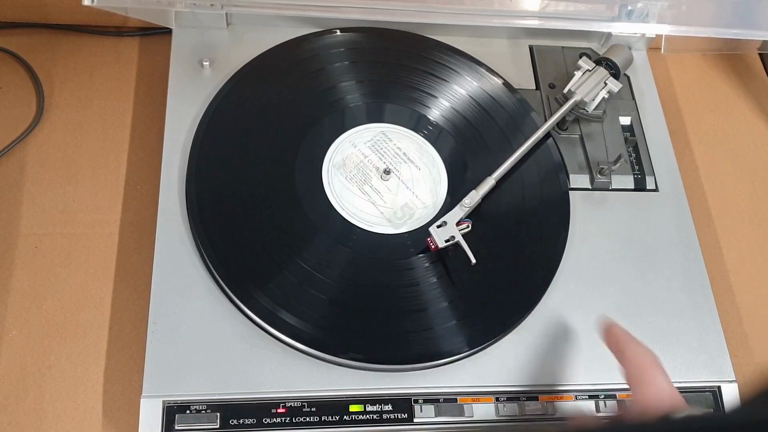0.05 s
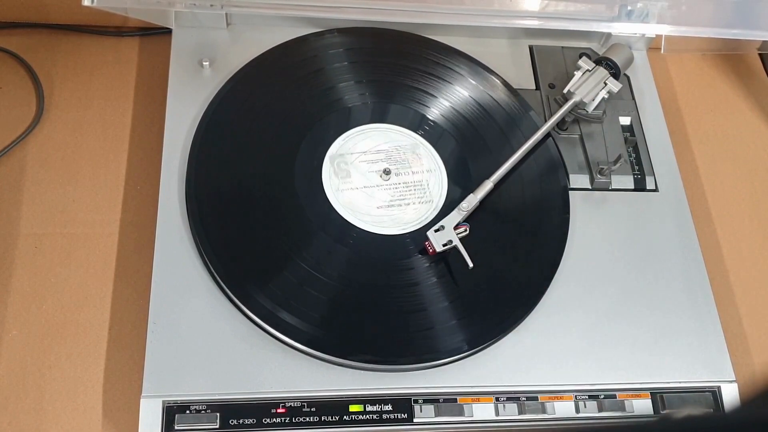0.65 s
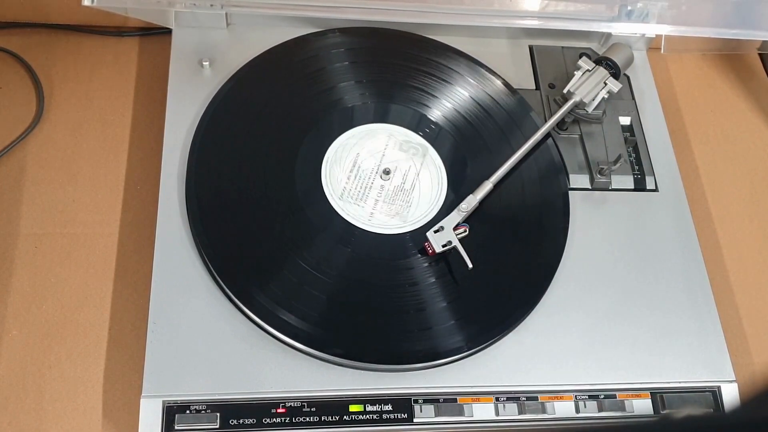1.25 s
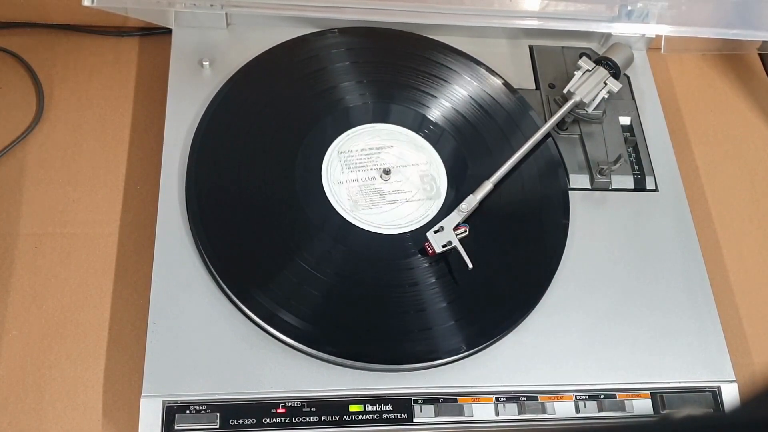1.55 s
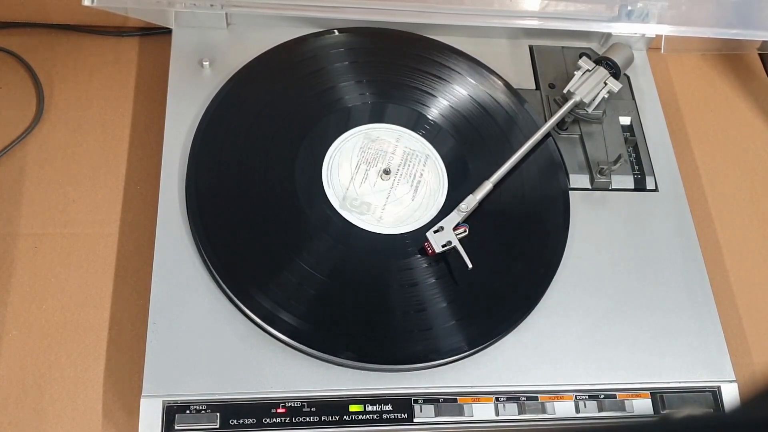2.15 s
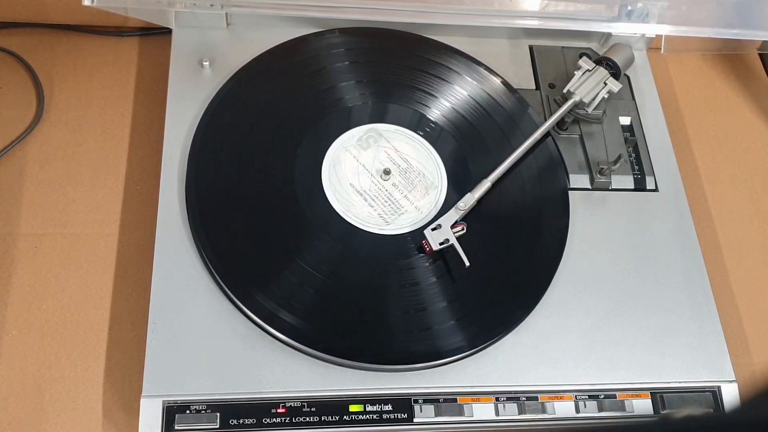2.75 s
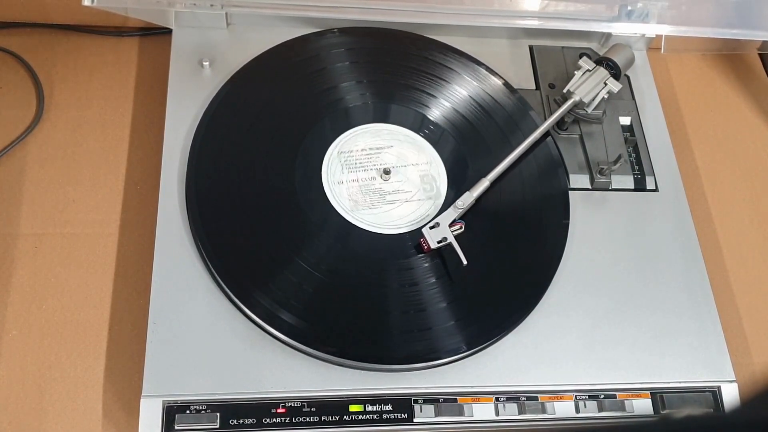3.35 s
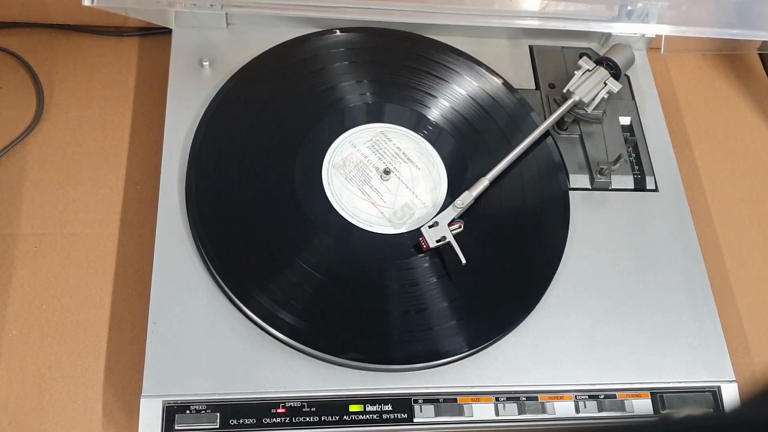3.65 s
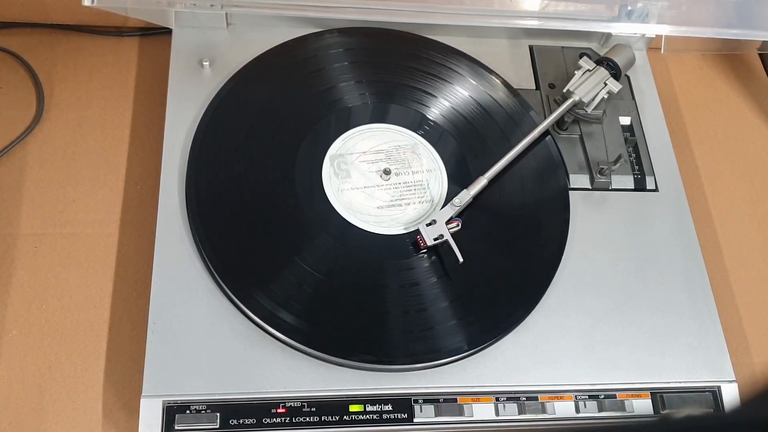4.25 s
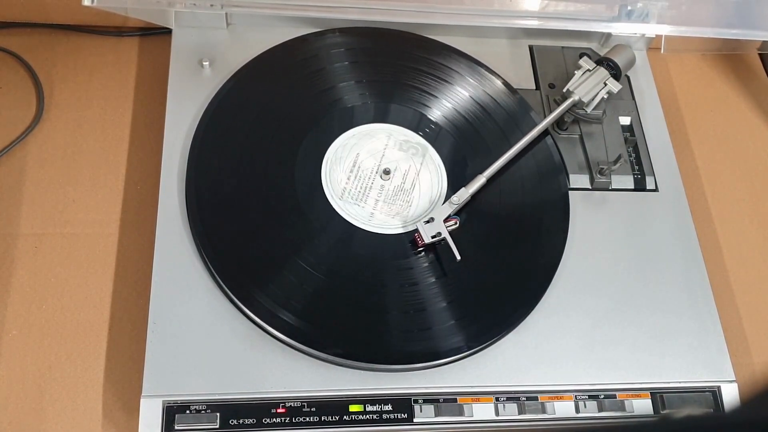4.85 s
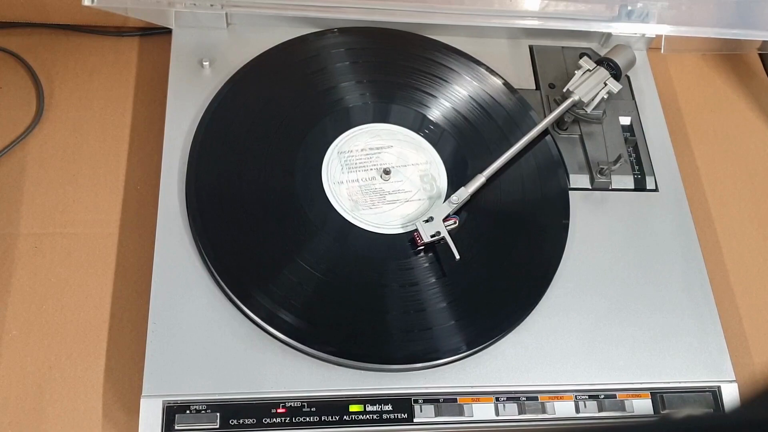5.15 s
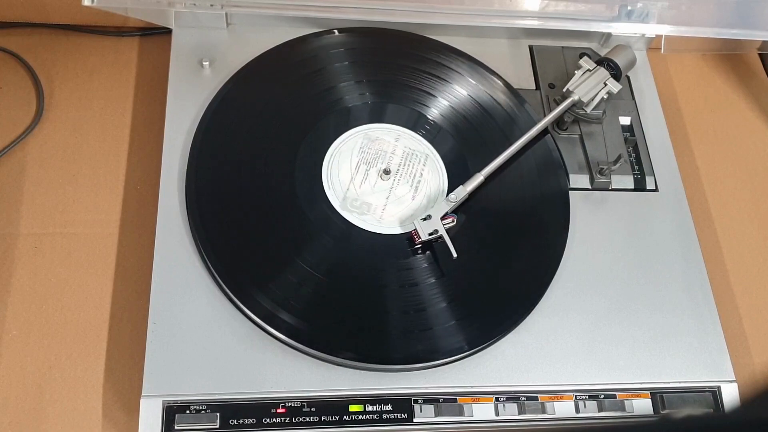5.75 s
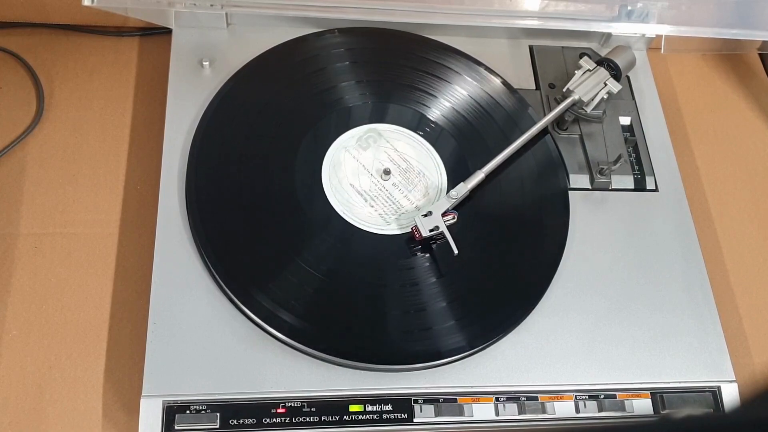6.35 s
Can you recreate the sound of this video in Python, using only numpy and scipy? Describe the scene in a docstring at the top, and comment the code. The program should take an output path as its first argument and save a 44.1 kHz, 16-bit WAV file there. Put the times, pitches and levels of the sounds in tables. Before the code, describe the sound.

A button clicks, a record player's stylus thumps down, and the groove rumbles and crackles until the arm lifts with a groan and thump.

```python
"""Record player in a small room

A button snaps and the stylus drops on the record with two thumps from a loudspeaker on the left.
The silent groove rumbles and swishes as the record turns, and specks pop under the stylus.
Then the return gear sticks and slips with a groan, and the arm lifts off with a last thump."""
import sys
import numpy as np
from scipy import signal
from scipy.fft import rfft, irfft
from scipy.io import wavfile
from scipy.ndimage import uniform_filter1d

SR = 44100
rng = np.random.default_rng(int(sys.argv[2]) if len(sys.argv) > 2 else 0)


def log_audio(samples):
    """Write samples as a 16-bit WAV file to the path given in sys.argv[1]."""
    # one column per channel
    frames = np.atleast_2d(samples).T
    # limit to full scale, then quantise
    limited = np.clip(frames, -1, 1)
    pcm = np.round(limited * 32767).astype(np.int16)
    wavfile.write(sys.argv[1], SR, pcm)


N = 290619
TIME = np.arange(N) / SR
RING_TIME = np.arange(SR // 2) / SR
TURN_S = 1.8

# Jolts that reach the pickup. Each row: start in seconds, woofer level in dB, pitch in Hz,
# swell in seconds, crack level in dB, crack low-pass in Hz.
JOLTS = [(.448, -43.5, 63, .013, -58, 502), (0.8085, -6.5, 213, 0.006, -15.5, 4930),
         (0.8217, -16, 120, 0.0057, -30, 598), (.8840, -4, 172.3, 0.0039, -0.5, 5430),
         (2.768, -41, 222, 0.00444, -51, 800), (3.0200, -43, 187, 0.0051, -52.5, 900),
         (5.9178, -30, 195, 0.0056, -57, 510), (6.0691, -28.5, 174.6, .004, -41, 600),
         (6.0777, -29, 347, 0.0048, -15.5, 455), (6.0786, -7.5, 146.3, 0.0043, -66, 508)]
# Big specks in the groove. Each row: start in seconds, then body, snap and spray in relative dB.
POPS = [(1.091, -48, -70, -63.5), (1.804, -45.5, -67, -68), (2.147, -48, -78, -84.5),
        (2.262, -49.5, -61.5, -73), (2.637, -50, -73, -70.5), (2.766, -45, -66, -83),
        (3.022, -40, -63, -67), (3.193, -40.5, -54.5, -66), (3.224, -47, -64, -61.5),
        (3.536, -45, -65, -64), (3.686, -38.5, -52, -52), (3.996, -55, -55, -67), (4.051, -42.5, -66, -86),
        (4.304, -45.5, -81, -73), (4.408, -40.5, -82, -85), (4.465, -46.5, -81, -67),
        (5.144, -49, -75, -84), (5.379, -51, -67, -69), (5.649, -42, -63, -64), (5.92, -35, -46.5, -52.5)]
# Scuffed patches. Each row: start in seconds, length in seconds, level in dB.
SCUFFS = [(1.70, 0.22, -78.5), (2.817, 0.072, -77), (3.204, .06, -78), (3.663, 0.06, -70),
          (3.735, .08, -76.5), (3.979, 0.038, -74), (4.242, 0.044, -79), (4.642, 0.055, -76.5),
          (5.387, .08, -76.5), (5.604, 0.045, -75), (5.933, 0.093, -76), (6.057, 0.025, -73)]
# Button and switch clicks. Each row: start in seconds, thud in dB, rattle in dB, its T60 in seconds.
CLICKS = [(0.412, -58.5, -46.5, 0.076), (0.4425, -33.5, -40, 0.0026), (.4470, -30, -70, .012),
          (0.4503, -51.5, -75, 0.025), (0.4554, -37.5, -28, 0.031), (0.4579, -36, -23, 0.02),
          (0.4636, -25, -34.5, 0.07), (0.8125, -72.5, -47.5, 0.015), (.8838, -71.5, -39, .007),
          (.9392, -80, -48, 0.025)]
# Groans of the return gear. Each row: start, rise and fall in seconds, pitch in Hz, sag rate per second,
# peak level in dB, drop at both ends in dB, overtone boost in dB.
GROANS = [(5.698, .035, .045, 310, 0.54, -41, 3.5, -11), (5.788, 0.036, 0.09, 125.5, 1.7, -32.5, 19, 4)]

# Resonances. Each row: frequency in Hz, relative level in dB, T60 in seconds.
BOOM_MODES = [(63.5, -34.5, 0.36), (111, -25, 0.33), (188, -33, .22), (226.9, -14, 0.18),
              (365.5, -31.5, 0.1)]  # cabinet and room
ARM_MODES = [(1975, -36.5, .07), (2930, -43.5, 0.07), (3926, -48, .12), (4430, -45.5, .1),
             (5750, -52.5, .15), (7600, -59, 0.17)]  # tone arm
CONE_MODES = [(560, -24.5, 0.0055), (711, -14.5, .016), (946, -9.5, 0.012), (1464, -17.5, 0.021),
              (2135, -30.5, 0.0069)]  # loudspeaker cone
PANEL_MODES = [(225, -11.5, .12), (356.3, -8, 0.08), (415, -15.5, 0.15), (397, 1, 0.14), (614, -5.5, .05),
               (770, -5, 0.053), (856, -10, 0.055), (1380, -18, .03), (2900, -17.5, 0.037),
               (5400, -26.5, 0.07), (5540, -28, 0.08), (10355, -30, 0.068)]  # plastic front panel

# Tone colours of the hits and noise beds. Each row: frequency in Hz, relative level in dB.
CRACK_EQ = [(100, -16.5), (300, -5.5), (600, 4), (1000, -7), (1400, -14), (2100, -18), (3000, -26),
            (4000, -32), (5200, -34.5), (6200, -45), (7500, -50), (11000, -31.5), (16000, -45.5)]
POP_SNAP_EQ = [(500, -40), (1100, 1), (1600, 4), (2700, 4.5), (3300, 0.5), (4200, -33.5), (8000, -51)]
POP_EDGE_EQ = [(1000, -32.5), (2700, -4.5), (4300, 1.5), (5000, -1.5), (6000, 2), (7000, -6.5), (8300, -22),
               (12000, -13.5), (16000, -19)]
DRONE_EQ = [(80, -26), (130, -2), (190, 1.5), (225, -6), (280, -22), (420, -36), (900, -58)]
RUSH_EQ = [(200, -11.5), (330, 0), (450, -4), (750, 1.5), (1000, -1.5), (1250, -5), (1600, -10),
           (2800, -14), (4000, -38), (8000, -47)]
SWISH_EQ = [(1500, -16), (3000, 0), (4400, 5.5), (4900, -1), (5800, 6), (7000, -2.5), (8500, -7),
            (12000, -4), (16000, -16.5)]
LATCH_EQ = [(300, -5), (1000, -0.5), (3000, -6), (4200, -18), (5500, -2.5), (7500, -13.5), (9300, -2),
            (10500, 2.5), (13500, -1.5), (16000, -1.5)]
PLINTH_EQ = [(120, -18.5), (220, 2), (390, -7.5), (520, -10.5), (800, -12.5), (1000, -15.5), (1400, -29.5),
             (3000, -44.5)]
GEAR_EQ = [(50, -19), (100, 11.5), (220, 13), (305, 3), (350, -3), (460, -1.5), (580, -12.5), (740, -8),
           (1000, -27.5), (1500, -38), (4000, -67.5)]
RUMBLE_EQ = [(22, -19.5), (40, -8.5), (60, -2), (90, 1), (130, -4), (200, -19.5), (300, -22.5),
             (600, -44.5), (2000, -69.5)]
HISS_EQ = [(700, -15.5), (1200, -10), (1530, 3), (1800, 0), (2100, -2.5), (2400, 3), (2800, 3.5),
           (3100, -3.5), (3600, -20.5), (5000, -43.5)]
AIR_EQ = [(5000, -19.5), (9000, -15.5), (10500, -3), (11800, 1.5), (14500, -4), (16000, -3.5)]
ROOM_TONE_EQ = [(25, -9), (60, 3), (130, -6), (250, -20.5), (450, -28), (1100, -30.5), (1700, -38.5),
                (4500, -41.5), (8000, -52.5)]

# A slight warp swells the groove noise. Each row: swells per turn, first crest in seconds, depth in dB.
DRONE_SWELLS = [(1, 1.53, 1.8), (4, 0.15, 1.7)]
RUSH_SWELLS = [(1, 1.65, 0.8), (2, .31, 1.1), (4, .41, 1.5)]
SWISH_SWELLS = [(2, 0.17, 2), (5, .35, 1.5)]

# Fader rides for the stylus rush and platter rumble. Each row: time in seconds, relative level in dB.
RUSH_FADER = [(1.2, -73), (1.43, -75.5), (2.58, -79.5), (2.78, -77), (3.29, -77), (3.69, -71.5),
              (4.17, -77.5), (4.66, -72), (5.19, -76.5), (5.6, -72)]
RUMBLE_FADER = [(0.15, -80), (0.7, -51), (1.2, -55), (2.0, -67), (2.55, -57.5), (2.95, -60), (3.45, -53.5),
                (4.5, -52.5), (5.15, -57), (6.45, -59)]
# Fader rides for the hiss. Each row: time in seconds, then narrow and airy hiss in relative dB.
HISS_FADER = [(0.0, -73.5, -86.5), (0.83, -66, -76.5), (1.19, -71.5, -81.5), (2.7, -72, -84.5),
              (3.87, -66.5, -79), (5.03, -68.5, -79), (5.87, -66.5, -76.5), (6.2, -69.5, -81),
              (6.59, -70, -82)]

# How alike left and right are. Each row: frequency in Hz, coherence from 0 to 1.
COHERENCE = [(60, 0.95), (200, 0.97), (400, 1), (800, 0.68), (3000, 0.14), (7000, 0.34), (13000, .55)]
# Shading of the loudspeaker on the far side. Each row: frequency in Hz, right minus left in dB.
SHADOW_EQ = [(60, -3.5), (200, -0.5), (400, -10.5), (750, -4), (1300, -9.5), (2400, -7), (4400, -10.5),
             (9000, -19)]
# Early echoes off desk, lid and wall. Each row: delay in seconds, level in dB.
ECHOES = [(.0009, -17.5), (.0022, -9), (.0029, -11.5), (.0043, -14.5), (.0074, -14)]
# Reverb decay. Each row: frequency in Hz, T60 in seconds.
REVERB_T60 = [(100, 0.096), (220, 0.51), (600, 0.15), (1500, 0.22), (5000, 0.27), (14000, 0.23)]
# Reverb colour. Each row: frequency in Hz, gain in dB.
REVERB_EQ = [(60, -24), (200, -13), (400, -11), (700, -11), (1200, -9.5), (3000, -5.5), (6000, -9),
             (14000, -12)]


def stylus_thumps():
    """Each jolt gives a crack, a few swelling woofer cycles and a boom; the tone arm rings faintly."""
    woofer, cracks = np.zeros((2, N))
    for start, woofer_db, hz, swell_s, crack_db, lowpass_hz in JOLTS:
        progress = RING_TIME / swell_s
        swell = (progress * np.exp(1 - progress)) ** 2
        add(woofer, start, -amp(woofer_db) * swell * np.sin(2 * np.pi * hz * RING_TIME))
        add(woofer, start + swell_s, amp(woofer_db) * ring(BOOM_MODES))
        crack = signal.lfilter(*signal.butter(2, lowpass_hz, fs=SR), pulse(CRACK_EQ))
        add(cracks, start, amp(crack_db) * crack)
    arm = signal.oaconvolve(np.diff(cracks, prepend=0), ring(ARM_MODES))[:N]
    return loudspeaker(woofer + cracks, reverb_db=-3) + arm


def crackle(body_gain_db=9, snap_gain_db=13, spray_gain_db=12, low_cut_hz=520, detune=.07):
    """Specks flick the stylus, shake the cone and crumble in a spray, with grit and dust between them."""
    pops = np.zeros(N)
    snap, edge = pulse(POP_SNAP_EQ), pulse(POP_EDGE_EQ)
    for start, body_db, snap_db, spray_db in POPS:
        crumbs = rng.standard_normal(len(RING_TIME)) * np.exp(-RING_TIME / .003)
        spray = signal.fftconvolve(crumbs / np.linalg.norm(crumbs), edge)
        body = ring([(hz * (1 + detune * rng.uniform(-1, 1)), db, t60) for hz, db, t60 in CONE_MODES])
        add(pops, start, amp(body_db + body_gain_db) * highpass(body, low_cut_hz))
        add(pops, start, amp(snap_db + snap_gain_db) * snap)
        add(pops, start, amp(spray_db + spray_gain_db) * spray)
    grit, dust = specks(per_s=4.4), specks(per_s=56)
    add(pops, 0, signal.oaconvolve(amp(-70) * dust + amp(-61) * grit, edge))
    add(pops, 0, amp(-49) * signal.oaconvolve(grit, highpass(ring(CONE_MODES), low_cut_hz)))
    return loudspeaker(pops, reverb_db=2)


def specks(per_s):
    """Random flicks of uneven size while the stylus is down."""
    return (rng.random(N) < per_s / SR) * rng.uniform(-1, 1, N) * stylus_contact()


def stylus_contact():
    """A gate, open while the stylus rides in the groove."""
    return np.interp(TIME, [.81, .88, 6.07, 6.12], [0, 1, 1, 0])


def groove(spiral_start_s=3.15, spiral_rise_s=.32):
    """Ripples in the vinyl drone; its uneven grain rushes and swishes as the record turns."""
    # Near the label the groove spirals in faster and gets noisier.
    spiral = np.clip((TIME - spiral_start_s) / spiral_rise_s, 0, 1)
    drone = amp(-60.5 + spiral) * warp(DRONE_SWELLS) * noise(DRONE_EQ, right_db=-2, lag_samples=16)
    rush = amp(1) * fader(RUSH_FADER) * warp(RUSH_SWELLS) * noise(RUSH_EQ, right_db=-9.5, lag_samples=16)
    swish = amp(-92 + 3 * spiral) * warp(SWISH_SWELLS) * noise(SWISH_EQ, right_db=-6)
    grain, patches = waver(1.4, samples=700), waver(1.5, samples=2500)
    return (patches * (drone + grain * swish) + grain * rush) * stylus_contact()


def warp(swells):
    """A gain that repeats with every turn of the warped record."""
    return amp(sum(db * np.cos(2 * np.pi * per_turn * (TIME - crest) / TURN_S)
                   for per_turn, crest, db in swells))


def scuffs(ticks_per_s=1500):
    """Scuffed vinyl rasps under the stylus in dense runs of tiny ticks."""
    ticks = (rng.random(N) < ticks_per_s / SR) * rng.standard_normal(N)
    swell = np.zeros(N)
    for start, length, db in SCUFFS:
        add(swell, start, amp(db) * signal.windows.tukey(round(length * SR), .6))
    return loudspeaker(swell * unit_rms(colour(ticks, SWISH_EQ)), reverb_db=4)


def button(right_db=-3.5, plinth_t60=.5):
    """The key bottoms out on the panel, its latch snaps in a rattle and the hollow plinth rings on."""
    clicks = np.zeros((2, N))
    panel = highpass(ring(PANEL_MODES), 240)  # the panel's ring carries little bass
    for start, thud_db, rattle_db, t60 in CLICKS:
        burst = rng.standard_normal(len(RING_TIME)) + .4 * rng.standard_normal((2, len(RING_TIME)))
        plinth = decay(-19, plinth_t60) * unit_rms(colour(burst, PLINTH_EQ))
        rattle = decay(rattle_db, t60) * unit_rms(colour(burst, LATCH_EQ))
        add(clicks, start, amp(thud_db) * (panel + plinth) + rattle)
    return clicks * amp([[0], [right_db]]) + amp(1) * reverb(clicks.mean(0))


def return_gear(scrape_db=-8, harmonics=9):
    """Uneven stick-slip cycles swell into a groan, sag in pitch and fade, with some scraping."""
    groans = np.zeros(N)
    wobble, grip = waver(.2, samples=160), waver(1.3, samples=220)
    scrape = amp(scrape_db) * unit_rms(colour(rng.standard_normal(N), GEAR_EQ))
    for start, rise, fall, hz, sag, peak_db, drop_db, overtone_db in GROANS:
        active = (TIME > start) & (TIME < start + rise + fall)
        t = TIME[active] - start
        pitch = hz * np.exp(-sag * t) * wobble[active]
        phase = 2 * np.pi * np.cumsum(pitch) / SR
        slips = sum(amp(curve_at(GEAR_EQ, k * pitch) + overtone_db * (k > 1)) * np.sin(k * phase)
                    for k in range(1, harmonics + 1))
        swell = amp(peak_db - drop_db * np.interp(t, [0, rise, rise + fall], [1, 0, 1]))
        force = grip[active] * swell * signal.windows.tukey(len(t), .1)
        add(groans, start, force * (unit_rms(slips) + scrape[active]))
    return loudspeaker(groans, reverb_db=2)


def background():
    """The bed: platter rumble, a narrow hiss on the left, a thin airy hiss and still room tone."""
    rumble = amp(-1) * fader(RUMBLE_FADER) * noise(RUMBLE_EQ, right_db=-.5, lag_samples=16)
    hiss = amp(1) * fader(HISS_FADER) * noise(HISS_EQ, right_db=-29.5)
    air = amp(1) * fader(HISS_FADER, column=2) * noise(AIR_EQ, right_db=-5.5)
    air *= waver(.8, samples=1800)
    room_tone = amp(-63.5) * noise(ROOM_TONE_EQ, right_db=-.5)
    return rumble + hiss + air + room_tone


def loudspeaker(x, reverb_db, lag_samples=16):
    """Sound from the left reaches the right late and shaded; near surfaces throw back its treble."""
    treble = highpass(x, 900, order=1)
    left = x + sum(amp(db) * np.roll(treble, round(delay * SR)) for delay, db in ECHOES)
    right = colour(np.roll(left, lag_samples), SHADOW_EQ)
    return np.array([left, right]) + amp(reverb_db) * reverb(x)


def reverb(x, predelay_s=.00053, build_s=.0015):
    """Diffuse reflections of the small room, each band dying at its own speed."""
    white = noise([(20, 0), (20000, 0)], right_db=0)[:, :len(RING_TIME)]
    hz, t, bands = signal.stft(white, SR, nperseg=256)
    bands *= amp(-60 * t / curve_at(REVERB_T60, hz)[:, None])
    tail = signal.istft(bands, SR, nperseg=256)[1]
    tail = colour(tail / np.linalg.norm(tail[0]), REVERB_EQ)[:, :len(RING_TIME)]
    tail *= np.interp(RING_TIME, [predelay_s, predelay_s + build_s, .35, .45], [0, 1, 1, 0])
    return signal.fftconvolve(x[None], tail, axes=1)[:, :N]


def noise(eq, right_db, lag_samples=0):
    """Stereo noise, alike on both sides in the bass; the right can lag, and the centre has rms 1."""
    shared, separate = rfft(rng.standard_normal((2, N)))
    coherence = curve_at(COHERENCE, np.fft.rfftfreq(N, 1 / SR))
    blend = coherence * shared + np.sqrt(1 - coherence ** 2) * separate
    left, right = colour(irfft([shared, amp(right_db) * blend], N), eq)
    pair = np.array([left, np.roll(right, lag_samples)])
    return pair / np.std(pair.mean(0))


def pulse(eq, size=4096):
    """The sharpest causal click with this tone colour, peak 1."""
    log_gain = np.log(amp(curve_at(eq, abs(np.fft.fftfreq(size, 1 / SR)))))
    minimum_phase = np.exp(np.conj(signal.hilbert(log_gain)))
    click = np.fft.ifft(minimum_phase).real[:size // 2]
    return click / abs(click).max()


def ring(modes):
    """Dying sines of a struck body."""
    return sum(decay(db, t60) * np.sin(2 * np.pi * hz * RING_TIME) for hz, db, t60 in modes)


def decay(db, t60):
    """An envelope that starts at db and falls 60 dB in t60 seconds."""
    return amp(db - 60 * RING_TIME / t60)


def waver(depth_db, samples):
    """A random gain that drifts over about this many samples."""
    drift = uniform_filter1d(uniform_filter1d(rng.standard_normal(N), samples), samples)
    return amp(depth_db * unit_rms(drift))


def fader(rows, column=1):
    """One dB column of a fader ride as a gain for every sample."""
    rows = np.asarray(rows)
    return amp(np.interp(TIME, rows[:, 0], rows[:, column]))


def colour(x, eq):
    """Filters by an EQ curve."""
    size = x.shape[-1]
    return irfft(rfft(x) * amp(curve_at(eq, np.fft.rfftfreq(size, 1 / SR))), size)


def highpass(x, hz, order=2):
    """Thins out the lows."""
    return signal.lfilter(*signal.butter(order, hz, "high", fs=SR), x)


def curve_at(points, hz):
    """Reads a curve on a log-frequency axis."""
    point_hz, values = np.transpose(points)
    return np.interp(np.log(hz + 1), np.log(point_hz + 1), values)


def add(mix, start_s, sound):
    """Mixes a sound in at its start time."""
    part = mix[..., round(start_s * SR):][..., :sound.shape[-1]]
    part += sound[..., :part.shape[-1]]


def amp(db):
    """Decibels to gain."""
    return 10 ** (np.asarray(db) / 20)


def unit_rms(x):
    """Scales to rms 1."""
    return x / np.sqrt(np.mean(x ** 2) + 1e-20)


def scene():
    """The record player over its background bed, in stereo."""
    return button() + stylus_thumps() + crackle() + scuffs() + groove() + return_gear() + background()


def record(dry, low_cut_hz=40, high_cut_hz=15900):
    """Rolls off the deepest bass and the top of the treble."""
    dry = signal.sosfilt(signal.butter(4, low_cut_hz, "high", fs=SR, output="sos"), dry)
    lowpass = signal.firwin(511, high_cut_hz, window=("kaiser", 9), fs=SR)
    return signal.oaconvolve(dry, lowpass[None], "same")


dry = scene()
out = record(dry)
log_audio(out)
```